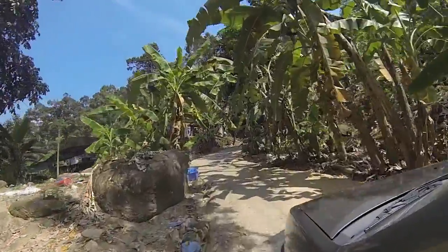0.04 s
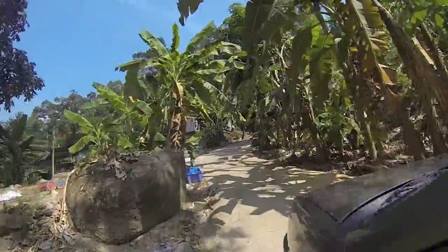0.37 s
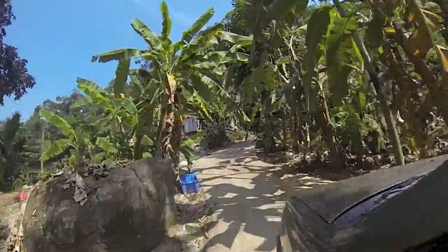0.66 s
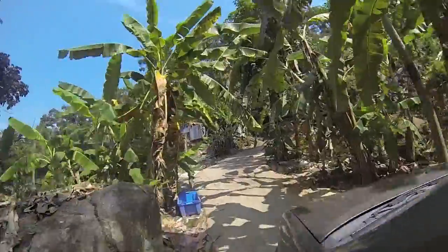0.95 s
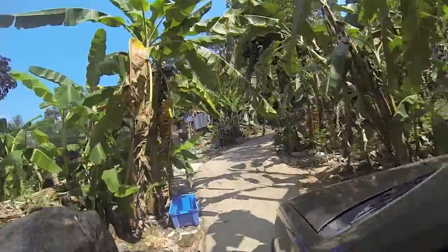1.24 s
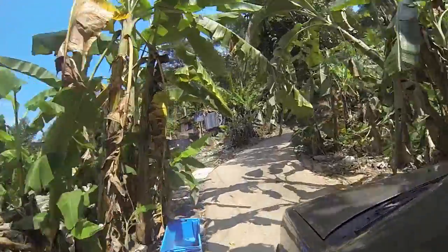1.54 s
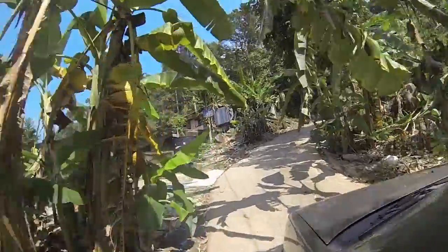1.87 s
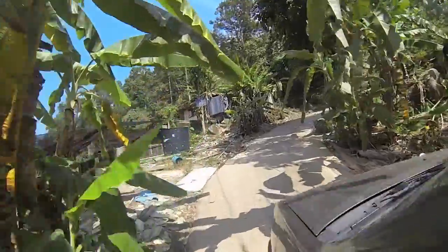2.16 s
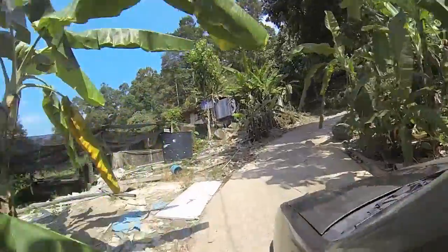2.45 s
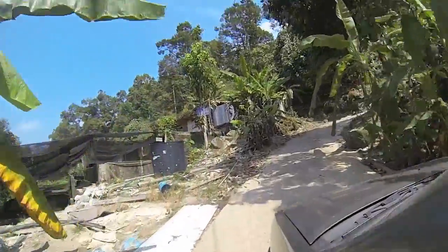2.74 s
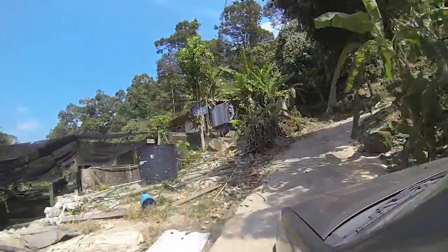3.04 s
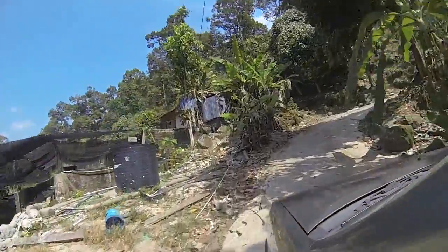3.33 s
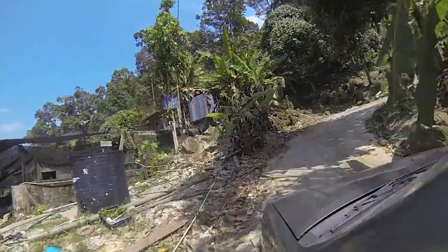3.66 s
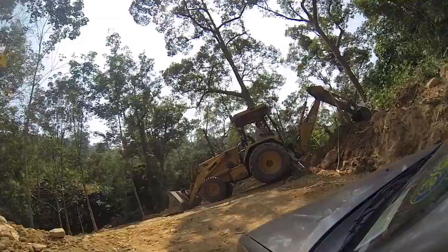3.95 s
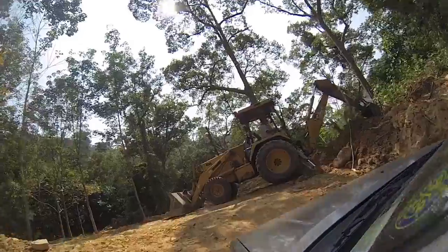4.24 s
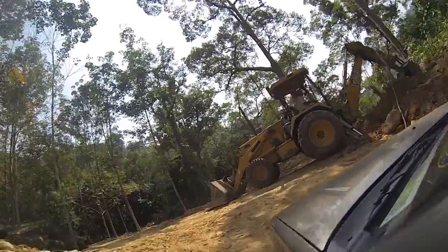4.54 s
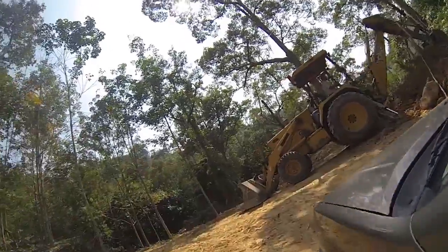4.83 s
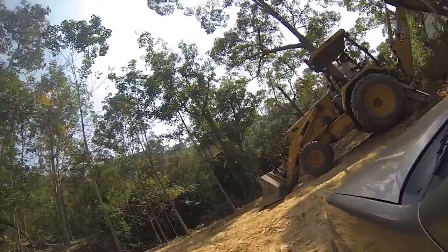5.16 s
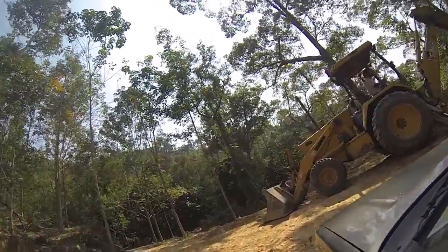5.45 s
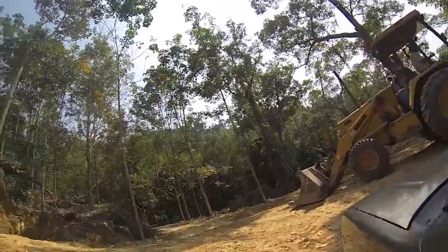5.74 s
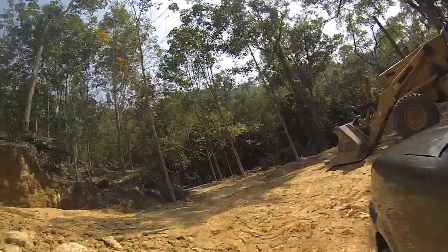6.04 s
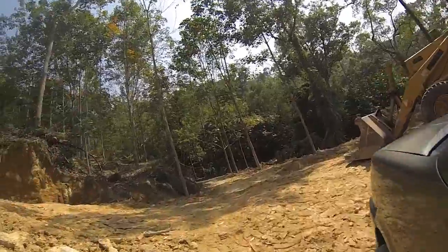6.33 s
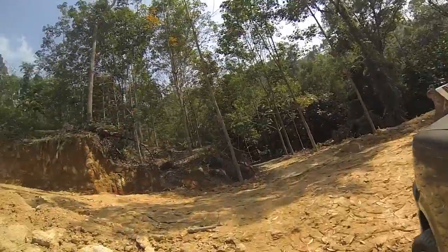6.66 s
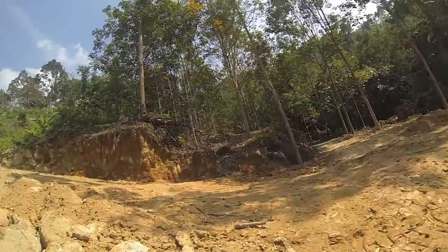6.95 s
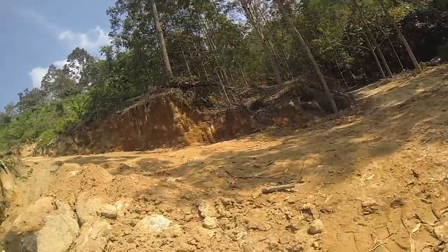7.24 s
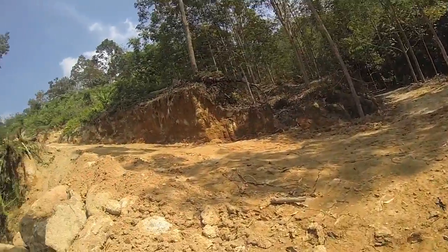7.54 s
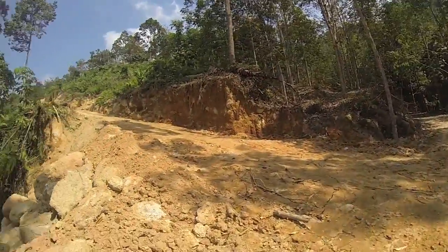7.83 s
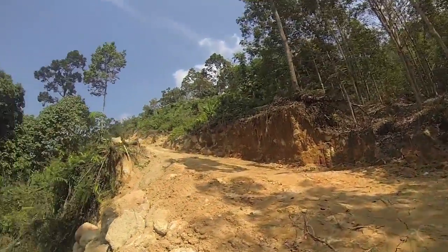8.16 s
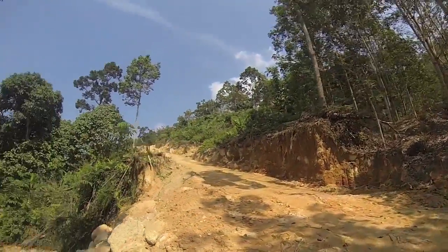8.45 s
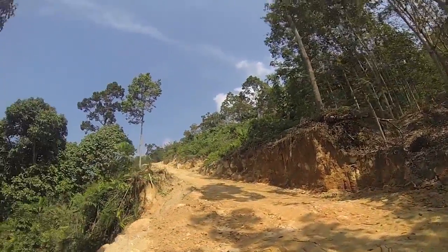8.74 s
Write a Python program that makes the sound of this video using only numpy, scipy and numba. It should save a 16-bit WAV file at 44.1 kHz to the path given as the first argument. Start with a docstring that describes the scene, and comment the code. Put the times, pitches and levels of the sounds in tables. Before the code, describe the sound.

A low, steady car rumble gives way to loud thuds, plastic chatter and tyres grinding through dirt, with the jolts gradually easing.

```python
"""A car on a rough dirt track

Heard by a small camera in a closed case fixed to the car, the engine first hums evenly.
Then ruts shake the car, the tyres scrub, the camera's mount knocks and its loose joints chatter.
The hardest knocks overload the camera: its gain dives and creeps back, and a faint whine with it."""
import sys
import numpy as np
from scipy import signal
from scipy.fft import rfft, irfft, next_fast_len
from scipy.io import wavfile
from scipy.ndimage import uniform_filter1d
from numba import njit

SR = 44100
rng = np.random.default_rng(int(sys.argv[2]) if len(sys.argv) > 2 else 0)


def output_pcm(signal):
    """Save a mono or channel-first signal as 16-bit PCM at the path in sys.argv[1].

    Samples are clipped to [-1, 1] before scaling.
    """
    pcm = np.clip(np.atleast_2d(signal).T, -1, 1) * 32767
    wavfile.write(sys.argv[1], SR, np.round(pcm).astype(np.int16))


N = 387638


def undb(db):
    """Turn decibels into a number to multiply by."""
    return 10 ** (np.asarray(db) / 20)


def unit(x):
    """Scale a sound to an average (rms) size of 1."""
    return x / np.sqrt(np.mean(x ** 2) + 1e-20)


def curves(table):
    """Join a table's rows with straight lines in time: one curve for each column after the first."""
    times, *columns = np.transpose(table)
    return [np.interp(np.arange(N) / SR, times, column) for column in columns]


def add(out, start_s, x):
    """Mix x into out from start_s on."""
    i = max(int(start_s * SR), 0)
    out[i:i + len(x)] += x[:max(len(out) - i, 0)]


def colour(x, points):
    """Shape the lows and highs of a sound along (f/Hz, level/dB) points."""
    size = next_fast_len(len(x))
    hz, db = np.transpose(points)
    f = np.maximum(np.fft.rfftfreq(size, 1 / SR), 1)
    gain = undb(np.interp(np.log(f), np.log(hz), db))
    return irfft(rfft(x, size) * gain, size)[:len(x)]


def ring(x, modes, tail=0, order=1):
    """Let x ring an object's own notes (f/Hz, width/Hz, level/dB); tail adds samples to fade in."""
    size = next_fast_len(len(x) + tail)
    f = np.fft.rfftfreq(size, 1 / SR)
    response = sum(undb(db) * (1j * f * width / (hz ** 2 - f ** 2 + 1j * f * width)) ** order
                   for hz, width, db in modes)
    return irfft(rfft(x, size) * response, size)[:len(x) + tail]


def lowpass(x, hz, order):
    """Soften everything above hz, more steeply with a higher order."""
    return signal.sosfilt(signal.butter(order, hz, "low", fs=SR, output="sos"), x)


def wander(per_s):
    """A curve of size about 1 that glides to a new random value per_s times a second."""
    step = int(SR / per_s)
    held = np.repeat(rng.standard_normal(N // step + 1), step)
    return unit(uniform_filter1d(held, step)[:N])


def fade(count, rise_s, fall_s):
    """Fade in, hold and fade out over count samples."""
    t = np.arange(count) / SR
    return np.clip(np.minimum(t / rise_s, t[::-1] / fall_s), 0, 1)


def whine(hz=12898, bursts_per_s=47.95, whistle_db=-65.3, undertone_db=-79):
    """The camera's electronics whistle in short, regular bursts over a faint tone an octave down."""
    t = np.arange(N) / SR
    burst, progress = np.divmod(t * bursts_per_s, 1)
    phase = rng.uniform(0, 2 * np.pi, int(burst[-1]) + 1)[burst.astype(int)]  # each starts afresh
    on = np.clip(np.minimum(progress, .45 - progress) / .05, 0, 1)  # on for 45% of the time
    whistle = unit(on * np.sin(2 * np.pi * hz * t + phase))
    undertone = unit(ring(rng.standard_normal(N), [(hz / 2, 180, 0)], order=2))
    return whistle * undb(whistle_db) + undertone * undb(undertone_db)


# faint squeals of a dry joint: t/s, length/s, f/Hz, level/dB
SQUEALS = [(7.505, .13, 8000, -78), (8.571, 0.24, 4980, -70), (8.681, 0.067, 8040, -71)]
def squeals(width_hz=130):
    """A dry joint sings thinly for a moment."""
    out = np.zeros(N)
    for start, length, hz, db in SQUEALS:
        count = int(length * SR)
        tone = ring(rng.standard_normal(count), [(hz, width_hz, 0)], order=2)
        add(out, start, unit(tone * np.hanning(count)) * undb(db))
    return out


def leaf(middle_s=2.2, length_s=0.068, db=-57):
    """A leaf brushes the car with one soft, high swish."""
    out, count = np.zeros(N), int(length_s * SR)
    tone = [(1500, -23), (3800, -14), (4800, 2), (7000, -9), (12000, -20), (14000, -40)]
    swish = colour(rng.standard_normal(count), tone)
    add(out, middle_s - length_s / 2, unit(swish * np.hanning(count)) * undb(db))
    return out


# how the engine runs: t/s, firing rate/Hz, boom level/dB, drone level/dB
ENGINE_RUN = [(0, 57.5, -46, -59.5), (.55, 59.88, -42, -61.5), (1, 59.36, -50.5, -69),
              (1.5, 59.48, -48.5, -65.5), (2.05, 50.47, -57, -54), (2.4, 53.63, -53, -64.5),
              (2.85, 55.15, -49.5, -63.5), (3.3, 54.36, -60, -64.5), (4, 55, -62, -61),
              (4.14, 55.4, -48.5, -43), (5, 55.47, -57, -46.5), (6.7, 54.5, -41.5, -39),
              (7.4, 54, -53, -56)]
# the tones in the boom: multiple of the firing rate, added level/dB
BOOM_TONES = [(1, 3), (2, -.5), (3, -14.5)]
# how loud the valves and belt clatter: t/s, level/dB
CLATTER_LEVEL = [(0, -52), (.8, -49.5), (1.3, -48.5), (2.6, -49.5), (3.3, -52)]
# the notes the engine bay rings at: f/Hz, width/Hz, level/dB
BAY_NOTES = [(1391, 245, 4), (2020, 4600, -39), (2740, 760, -15.5), (3380, 350, -12.5), (4900, 890, -19.5),
             (6000, 360, -38.5), (7800, 900, -31.5)]
def engine(tremble_top_hz=3800):
    """Firings boom through the car, a panel drones, valves and belt clatter, loose parts tremble."""
    firing_hz, boom_db, drone_db = curves(ENGINE_RUN)
    phase = 2 * np.pi * np.cumsum(firing_hz * (1 + 0.0014 * wander(14))) / SR
    boom = sum(undb(db + 0.99 * wander(4.5)) * np.sin(multiple * phase + rng.uniform(0, 2 * np.pi))
               for multiple, db in BOOM_TONES)
    drone = np.sin(4 * phase) * undb(drone_db + 2 * wander(10))
    hum = np.sqrt(2) * (boom * undb(boom_db) + drone)
    pulsing = rng.standard_normal(N) * (1 + 0.1 * np.sin(phase)) * undb(1.24 * wander(25))
    clatter = unit(ring(pulsing, BAY_NOTES, order=2)) * undb(curves(CLATTER_LEVEL)[0])
    loose_parts = ring(rng.standard_normal(N) * undb(4.6 * wander(37)), BAY_NOTES)
    tremble = unit(lowpass(loose_parts, tremble_top_hz, order=4))
    return hum + clatter + tremble * np.sqrt(power_after_jolts(-47, decay_s=0.25))


# the deep tone of the shaking car: f/Hz, level/dB
RUMBLE_TONE = [(12, -18), (24, -7.5), (38, -2.5), (49, -10.5), (65, -10.5), (100, -23.5), (170, -29),
               (245, -32), (400, -41.5), (750, -48.5), (1200, -67), (3000, -140)]
def rumble():
    """The car's body shakes; its shock absorbers even out the biggest swings."""
    shake = unit(colour(rng.standard_normal(N), RUMBLE_TONE))
    recent_power = uniform_filter1d(shake ** 2, SR // 12)
    return unit(shake / np.sqrt(recent_power + .5))


# the tone of rolling tyres: f/Hz, level/dB
ROLL_TONE = [(30, 0), (70, 2), (130, -23), (250, -23), (400, -21.5), (700, -21), (1050, -24), (2100, -28.5),
             (3600, -32.5), (4300, -45), (7000, -41.5), (9000, -48), (12800, -46.5), (13700, -89)]
def road(roll_db=-46, smooth_db=-40, dirt_db=-31.5, dirt_starts_s=4.05):
    """Tyres roll on steadily while the ground shakes the car, harder once on dirt."""
    waver_db = 0.9 * wander(5)
    roll = unit(colour(rng.standard_normal(N), ROLL_TONE)) * undb(roll_db + waver_db)
    shake_db = curves([(dirt_starts_s, smooth_db), (dirt_starts_s + 0.071, dirt_db)])[0]
    return roll + rumble() * undb(shake_db)


def power_after_jolts(relative_db, decay_s, rise_s=0.0091, usual_contact_ms=3.08):
    """Each jolt leaves motion that builds quickly and dies away; longer pushes leave more."""
    power = np.zeros(N)
    t = np.arange(3 * SR) / SR
    settle = (1 - np.exp(-t / rise_s)) * np.exp(-t / decay_s)
    for start, thud_db, contact_ms in JOLTS:
        size = undb(thud_db + relative_db) * contact_ms / usual_contact_ms
        add(power, start, (size * settle) ** 2)
    return power


def sway(vs_thud_db=-16.5, vs_scrub_db=-8, top_hz=58):
    """The car sways after jolts and while tyres scrub; its springs pass only slow motion."""
    power = power_after_jolts(vs_thud_db, decay_s=0.11)
    for start, length, db, _ in SCRUBS:
        add(power, start, scrub_shape(length, db + vs_scrub_db) ** 2)
    return unit(lowpass(rumble(), top_hz, order=3)) * np.sqrt(power)


def scrub_shape(length_s, db, ease_db_per_s=14):
    """How loud a scrub is over time: the tyre bites, eases as it grips, then lets go."""
    t = np.arange(int(length_s * SR)) / SR
    return fade(len(t), rise_s=0.019, fall_s=0.0075) * undb(db - ease_db_per_s * t)


# tyres scrubbing through loose dirt: t/s, length/s, level/dB, grit compared with judder/dB
SCRUBS = [(4.107, 0.54, -48.5, -2.5), (4.754, 0.099, -11, -5), (4.842, 0.11, -10, -5),
          (5.052, .18, -20, -14.5), (5.226, 0.063, -14.5, -14.5), (5.953, 0.061, -29, -10.5),
          (6.007, 0.442, -27.5, -4.5), (6.446, 0.13, -26, -8.5), (6.829, .10, -28.5, -15),
          (7.421, 0.13, -36, -9.5), (7.668, 0.149, -38.5, -8), (7.903, 0.43, -37.5, -7),
          (8.37, 0.056, -36.5, -1.5), (8.474, 0.14, -44.5, -27)]
# the tone of a juddering tyre: f/Hz, level/dB
JUDDER_TONE = [(30, -38), (60, -6), (130, 3.5), (180, -0.5), (250, 6.5), (340, -8.5), (480, -13),
               (760, -8.5), (1000, -20.5), (1400, -37.5), (3000, -81.5), (7000, -120)]
def scrubs(grit_top_hz=2600):
    """Tyres grind through dirt in uneven bursts: a low judder, with grit ringing the camera's case."""
    judder = unit(colour(rng.standard_normal(N) * undb(2.37 * wander(90)), JUDDER_TONE))
    grit = ring(rng.standard_normal(N) * undb(2.8 * wander(160)), CASE_NOTES, order=2)
    grit = unit(lowpass(grit, grit_top_hz, order=1))
    out = np.zeros(N)
    for start, length, db, grit_db in SCRUBS:
        shape = scrub_shape(length, db)
        burst = (judder + undb(grit_db) * grit)[int(start * SR):][:len(shape)]
        add(out, start, burst * shape[:len(burst)])
    return out


# the notes the camera's case rings at: f/Hz, width/Hz, level/dB
CASE_NOTES = [(250, 59, -7), (798, 170, -3.5), (1499, 360, 12), (1830, 460, -15), (2440, 270, -1),
              (3510, 150, -2.5), (3685, 174, 2), (4240, 900, -17.5), (5000, 170, -14), (6040, 270, -44)]
def case_click(crack=0.22, crack_s=0.0026, damping=2.1):
    """One hard hit, with a peak of 1: pressed together, the case rings only briefly."""
    t = np.arange(SR // 20) / SR
    force = crack * rng.standard_normal(len(t)) * np.exp(-t / crack_s)
    force[0] += 1
    sound = ring(force, [(hz, damping * width, db) for hz, width, db in CASE_NOTES], order=2)
    return sound / np.abs(sound).max()


# the bright tone of crackle: f/Hz, level/dB
CRACKLE_TONE = [(1000, -33), (3500, 12.5), (5100, 14.5), (6500, -8.5), (8000, -37), (11500, -27.5),
                (13000, -4.5), (14000, -43.5)]
def crackle(force):
    """Hard little contacts turn a force into a bright crackle."""
    return unit(colour(force, CRACKLE_TONE))


# loose joints chattering: t/s, length/s, level/dB, crackle compared with that level/dB
RATTLES = [(4.34, 0.071, -17.5, -10.5), (4.42, .137, -9.5, -17.5), (4.571, 0.015, -20, -20),
           (4.588, 0.059, -13, -24), (4.658, 0.061, -26, -33), (4.974, 0.021, -29, -29),
           (5.053, 0.062, -24, -30), (5.433, 0.048, -27.5, -33), (5.527, 0.11, -15.5, -14.5),
           (5.651, 0.054, -20.5, -28), (5.732, 0.014, -24, -20), (5.797, 0.019, -34, -19),
           (5.847, 0.015, -23.5, -24), (6.448, 0.042, -32.5, -27), (6.518, 0.042, -21.5, -33),
           (6.578, 0.068, -19.5, -30), (6.874, 0.015, -28.5, -30), (7.144, 0.015, -40.5, -26),
           (7.453, 0.022, -29.5, -15.5), (7.908, 0.21, -39.5, -18.5), (8.183, 0.038, -31, -30),
           (8.255, 0.033, -31, -31), (8.403, 0.023, -40.5, -26)]
def rattles(taps_per_s=380, scatter_db=2.5, rub=0.06, top_hz=7200, spot_db=2.0, detune=0.019):
    """Loose joints ring the case with quick, uneven taps and a little rubbing; hard taps crackle."""
    out = np.zeros(N)
    pressure = undb(wander(130))  # makes the taps come in bunches
    for start, length, db, crackle_db in RATTLES:
        first, count = int(start * SR), max(int(length * SR), 64)
        gaps = rng.uniform(.3, 1.7, 200) * SR / taps_per_s
        taps = (np.cumsum(gaps) - gaps[0] / 2).astype(int)
        sizes = undb(scatter_db * rng.standard_normal(len(taps)))
        force = rub * rng.standard_normal(SR // 2)[:count]
        force[taps[taps < count]] += sizes[taps < count]
        force *= pressure[first:first + count] * fade(count, 0.13 * length, 0.32 * length)
        # each rattle touches another spot, which changes the pitch and strength of the notes
        chance = rng.standard_normal((len(CASE_NOTES), 2))
        notes = [(hz * (1 + detune * shift), width, note_db + spot_db * boost)
                 for (hz, width, note_db), (shift, boost) in zip(CASE_NOTES, chance)]
        chatter = lowpass(ring(force, notes, tail=SR // 20, order=2), top_hz, order=3)
        add(out, start, chatter * undb(db) / np.sqrt(np.sum(chatter ** 2) / count))
        add(out, start, crackle(force * np.abs(force)) * undb(db + crackle_db))
    return out


# the case snapping against its clip: t/s, level/dB
SNAPS = [(4.313, 1), (4.341, -4.5), (4.368, -2), (4.489, 5), (4.514, 7), (4.527, 2), (4.534, 5),
         (4.758, -7), (5.095, -9), (5.548, -2), (6.908, -13), (7.017, -22.5), (7.459, -19)]
def snaps(top_hz=5000, edge_db=-23, edge_s=.0015):
    """The case snaps against its clip: a click with a bright, crackling edge."""
    out = np.zeros(N)
    t = np.arange(SR // 50) / SR
    for start, db in SNAPS:
        edge = crackle(rng.standard_normal(len(t))) * np.exp(-t / edge_s)
        add(out, start, undb(db) * lowpass(case_click(), top_hz, order=3))
        add(out, start, undb(db + edge_db) * edge)
    return out


# the mount hitting its end stop: t/s, peak level/dB, high note compared with low note/dB
SLAMS = [(4.3148, -4, 9), (4.5144, -1, 20), (4.7182, -3, -12), (5.523, 0.5, -16), (6.507, 6.5, -0.5)]
# the stop's low and high note: f/Hz, width/Hz
STOP_NOTES = [(760, 407), (1500, 320)]
def slams():
    """On the hardest jolts the mount hits its stop with a short, hollow clack."""
    out = np.zeros(N)
    low_note, high_note = STOP_NOTES
    for start, db, high_db in SLAMS:
        clack = ring(np.ones(1), [(*low_note, 0), (*high_note, high_db)], tail=SR // 20, order=2)
        add(out, start, undb(db) * clack / np.abs(clack).max())
    return out


# jolts through the mount: t/s, thud peak level/dB, contact time/ms
JOLTS = [(0.552, -28, 2.7), (1.151, -30.5, 3.1), (1.585, -23.5, 7.3), (2.544, -26, 5), (2.817, -24.5, 4.2),
         (3.249, -27, 5.7), (4.14, -20.5, 4.5), (4.313, 6.5, 3.26), (4.481, 11, 3.13), (4.7183, 15, 3.14),
         (5.056, 2, 1.87), (5.085, 5, 3.9), (5.346, -8.5, 4.2), (5.445, -3.5, 4.9), (5.523, 7, 2.3),
         (5.548, 4.5, 4), (5.812, -8.5, 4), (6.02, -1.5, 4), (6.508, 5, 1.45), (6.704, -8.5, 3.4),
         (6.805, -12, 2.1), (6.82, -6.5, 3.9), (6.876, -9.5, 1.6), (6.908, -1.5, 3.2), (6.988, -10, 1.63),
         (7.018, -8, 2), (7.453, -10, 2.5), (8.071, -16.5, 3.3), (8.131, -17, 5.04), (8.18, -17.5, 3.3),
         (8.272, -9, 4), (8.604, -16.5, 3.6)]
# the notes the mount rings at: f/Hz, width/Hz, level/dB
MOUNT_NOTES = [(42.3, 10.2, 7), (83.3, 144, 3), (230.6, 44, -1), (742, 590, -1)]
def knocks(top_hz=4600):
    """Each jolt pushes the mount into a thud; the shorter the push, the louder the case clicks."""
    out = np.zeros(N)
    t = np.arange(SR // 3) / SR
    for start, thud_db, contact_ms in JOLTS:
        push = np.sin(np.pi * np.clip(t * 1000 / contact_ms, 0, 1)) ** 2
        thud = ring(push, MOUNT_NOTES)
        click_db = -14 - 12.5 * np.log2(contact_ms / 1.97)  # twice as long is 12.5 dB softer
        add(out, start, undb(thud_db) * thud / np.abs(thud).max())
        add(out, start, undb(thud_db + click_db) * case_click())
    return lowpass(out, top_hz, order=4)


def scene():
    """Everything that reaches the camera, in one channel."""
    jolts = knocks() + slams() + snaps()
    return (engine() + road() + sway() + scrubs() + rattles() + jolts + squeals() + leaf() + whine())[None]


@njit
def gain_control(x, ceiling, depth_db, dive_db_per_s, recover_db_per_s):
    """When the sound gets too loud, the camera turns itself down fast, then creeps back up."""
    y, down_db, diving = np.empty(len(x)), 0., False
    for i in range(len(x)):
        y[i] = x[i] * 10 ** (-down_db / 20)
        diving = (diving or abs(y[i]) > ceiling) and down_db < depth_db
        down_db = down_db + dive_db_per_s / SR if diving else max(down_db - recover_db_per_s / SR, 0.)
    return y


# a brief dip in the whole sound: t/s, level/dB
LEVEL_DIP = [(3.98, 0), (4.015, -8), (4.035, -22), (4.055, -8), (4.09, 0)]
def record(dry, top_hz=14700):
    """The camera turns down and clips loud knocks; the level dips once and the top treble is cut."""
    held = gain_control(dry[0], ceiling=.85, depth_db=19., dive_db_per_s=500., recover_db_per_s=18.)
    dipped = np.clip(held, -1, 1) * undb(curves(LEVEL_DIP)[0])
    treble_cut = signal.ellip(8, .2, 70, top_hz, fs=SR, output="sos")
    return signal.sosfilt(treble_cut, dipped)[None]


dry = scene()
out = record(dry)
output_pcm(out)
```